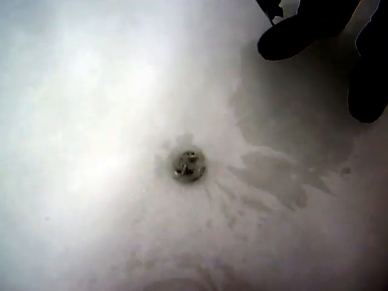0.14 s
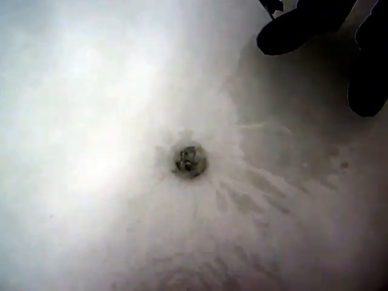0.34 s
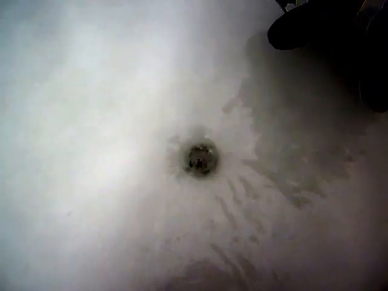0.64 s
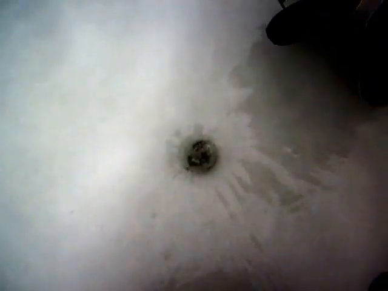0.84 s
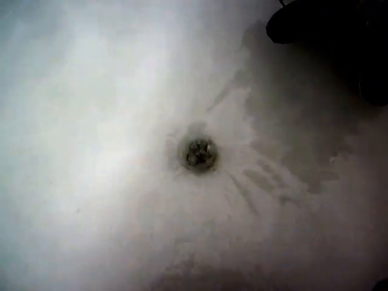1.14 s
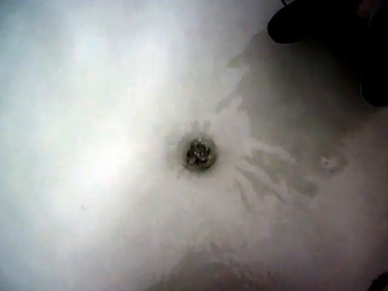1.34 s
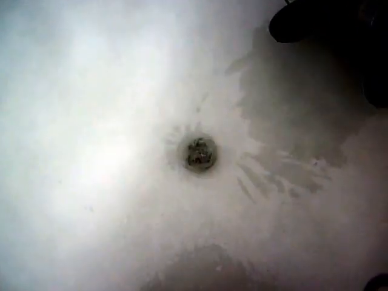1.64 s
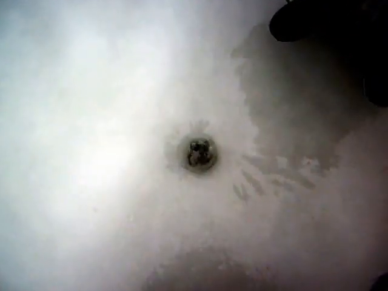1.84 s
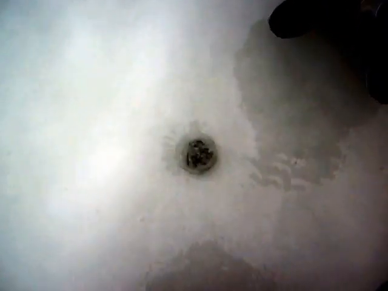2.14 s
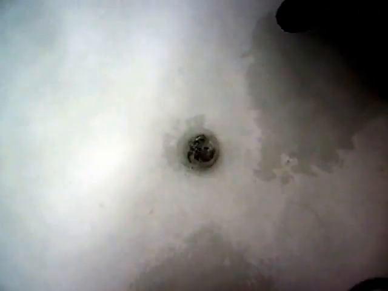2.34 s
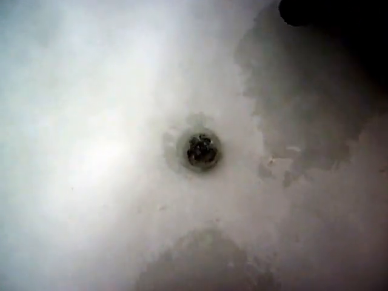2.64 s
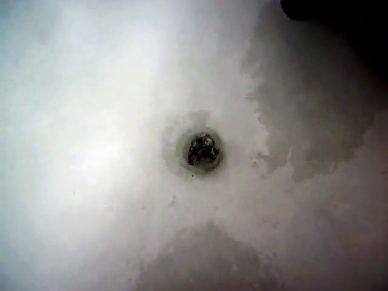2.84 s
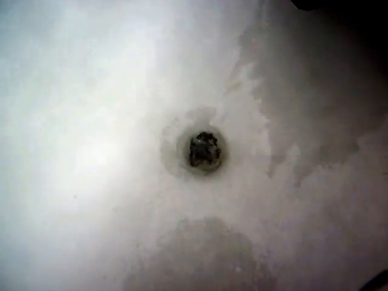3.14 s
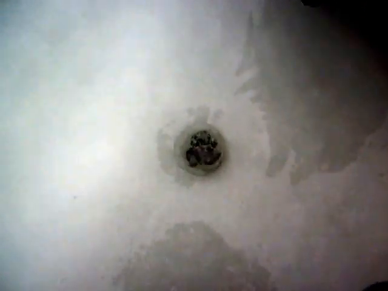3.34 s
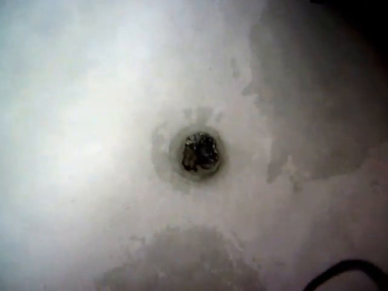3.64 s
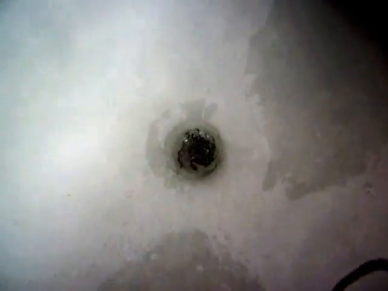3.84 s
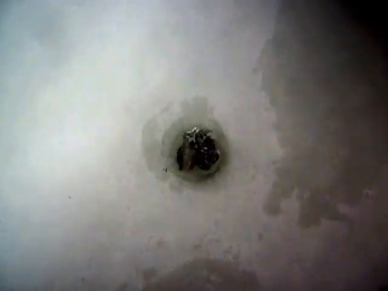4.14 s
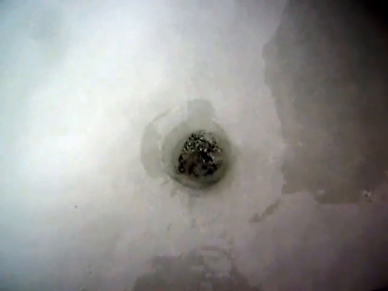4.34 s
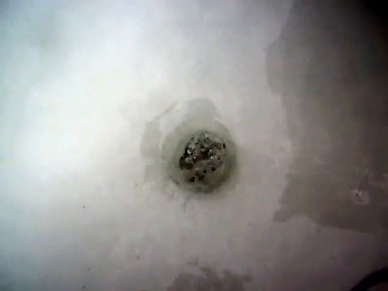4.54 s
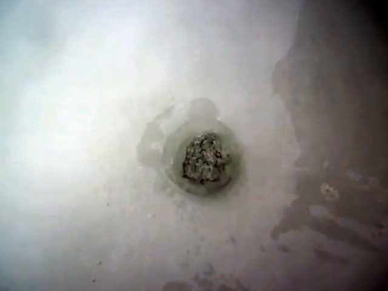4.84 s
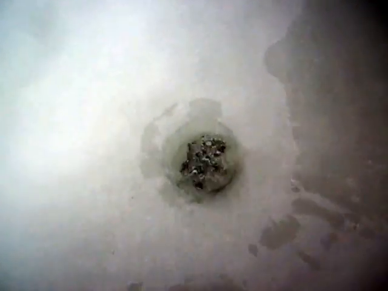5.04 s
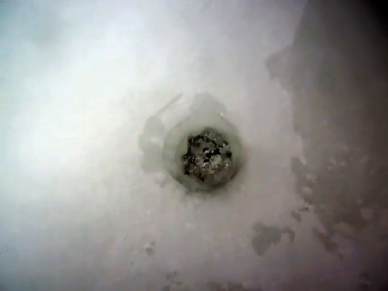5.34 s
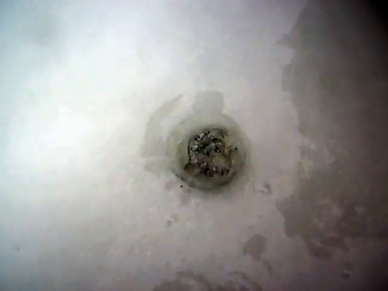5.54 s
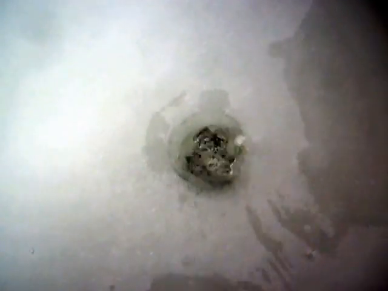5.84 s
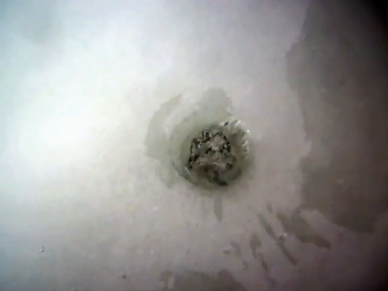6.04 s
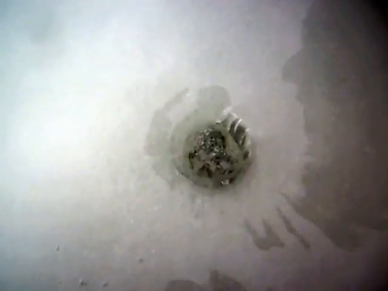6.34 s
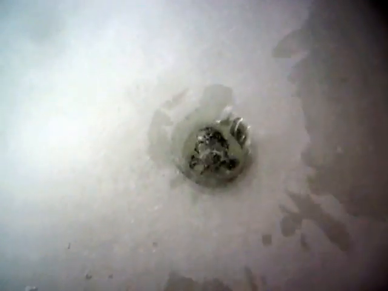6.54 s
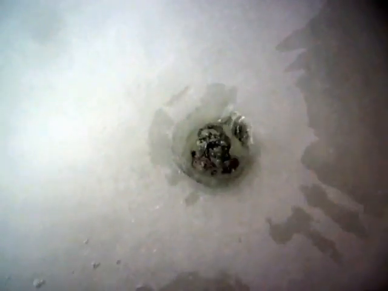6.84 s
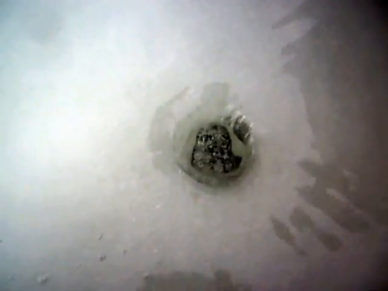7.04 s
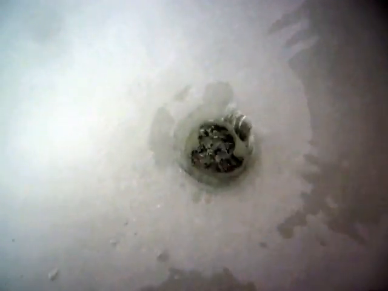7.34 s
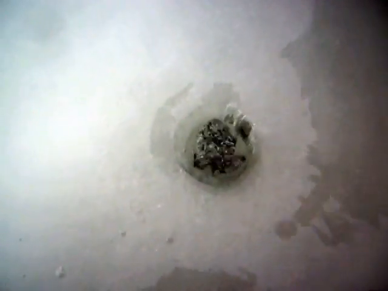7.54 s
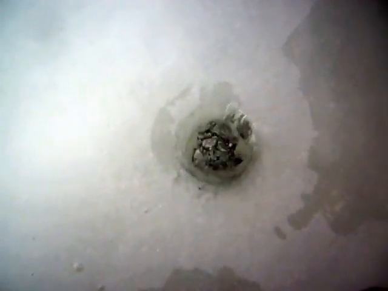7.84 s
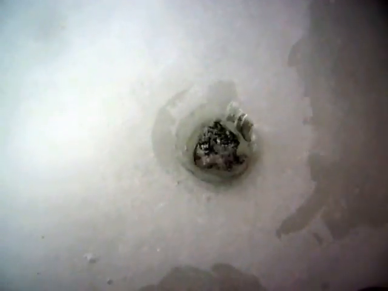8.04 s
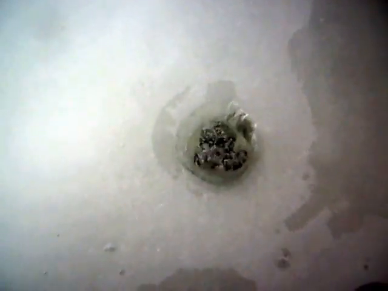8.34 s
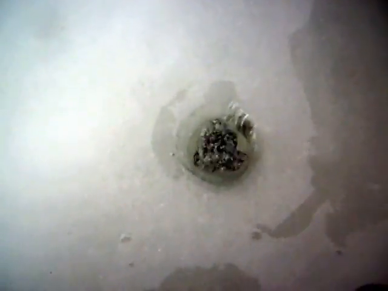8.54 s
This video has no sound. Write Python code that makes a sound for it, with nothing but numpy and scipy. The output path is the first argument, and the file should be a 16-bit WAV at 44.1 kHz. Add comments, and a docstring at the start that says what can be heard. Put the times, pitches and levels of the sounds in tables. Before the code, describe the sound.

Close, dry-sounding water on river ice drains into a small hole. From 0 to 3 s it is a modest, thin trickle: countless tiny bubbles with a high, narrow ring, rising and dipping in little wavelets, with scattered wet plips and fine crackling foam. Around 3.2 s a sharp bright plip stands out, and dull churning grows below. From about 4 s the flow swells quickly into a dense rush, with low gulps of air at 4.3 to 4.4 s and the loudest snapping bubbles around 4.7 to 4.9 s. The tone becomes fuller and more gurgling. Near 5.9 s it gulps softly again and a faint low hollow note appears, like a bottle. The flow eases slightly around 6.5 s, then runs on steadily to the end at about 8.7 s, with uneven surges, bright plips, droplet ticks, fizz and faint microphone hiss.

```python
"""Water standing on river ice drains through a small hole, heard from close by.
First comes a trickle: the inflow folds in air bubbles that each ring for a few milliseconds, coloured by the hole.
The trickle swells to a churn as the hole is washed wide, and pockets of air are gulped down near 4.3 s.
Near 5.9 s it gulps again as a funnel of air opens over the hole and resonates like a bottle.
The water then runs on with this faint hollow note; bubbles, droplets and crackling foam are heard throughout."""
import sys
import numpy as np
from scipy import signal
from scipy.fft import rfft, irfft, next_fast_len
from scipy.io import wavfile
from scipy.ndimage import uniform_filter1d

SR = 44100
rng = np.random.default_rng(int(sys.argv[2]) if len(sys.argv) > 2 else 0)


def file_out(sig):
    """Save sig as 16-bit WAV at sys.argv[1]."""
    # one column per channel
    cols = np.atleast_2d(sig).T
    # limit, then scale
    lim = np.clip(cols, -1, 1)
    pcm = np.round(lim * 32767).astype(np.int16)
    wavfile.write(sys.argv[1], SR, pcm)


N = 383669
TIME = np.arange(N) / SR  # seconds

# the loudest single bubbles: (time [s], level [dB], pitch [Hz], ring time [s])
LOUD_BUBBLES = [(0.232, -30, 2060, .0027), (0.678, -31.5, 1900, 0.0021), (0.73, -33.5, 820, 0.002),
                (1.076, -24.5, 3690, .0006), (1.158, -25, 1960, 0.0033), (1.3, -29.5, 3090, .0033),
                (1.427, -34, 1860, .0045), (1.531, -29.5, 1850, 0.0033), (1.57, -32.5, 880, .008),
                (1.663, -26.5, 3250, 0.0046), (1.945, -35.5, 580, 0.0023), (2.234, -30.5, 3160, 0.0064),
                (2.604, -31.5, 3250, 0.0083), (2.754, -32.5, 3380, 0.0099), (2.793, -29, 2970, .003),
                (3.186, -18, 3570, 0.0017), (3.68, -29.5, 760, 0.0021), (4.028, -22, 3180, .0028),
                (4.097, -19, 3080, 0.0023), (4.145, -27.5, 762, .006), (4.161, -22, 3230, 0.0046),
                (4.289, -21, 3400, .004), (4.4, -19.5, 3330, 0.0013), (4.419, -27.5, 824, 0.0046),
                (4.74, -33, 2100, 0.0062), (4.746, -15, 3230, 0.00065), (4.772, -19, 3360, 0.0024),
                (4.845, -24, 1910, 0.0035), (4.866, -20.5, 3420, 0.003), (4.867, -21.5, 963, .004),
                (4.896, -12.5, 2870, 0.001), (4.898, -14.5, 3390, 0.0031), (4.923, -26, 887, 0.0077),
                (5.137, -23, 3270, 0.00068), (5.363, -18.5, 794, 0.0037), (5.405, -27.5, 3860, 0.0077),
                (5.41, -21.5, 3160, 0.0042), (5.433, -19.5, 3730, 0.0014), (5.57, -30.5, 775, 0.01),
                (5.704, -29.5, 800, 0.0064), (5.865, -19, 3400, 0.0028), (5.9, -30.5, 730, 0.006),
                (5.987, -30.5, 777, 0.02), (5.993, -19, 1850, 0.00082), (6.005, -21, 3360, 0.0025),
                (6.338, -25.5, 2060, .0014), (6.51, -33.5, 780, .005), (6.78, -27, 3400, 0.0021),
                (7.02, -26.5, 860, 0.0064), (7.183, -28, 730, 0.002), (7.458, -31, 1980, 0.0045),
                (7.561, -24.5, 895, 0.0021), (7.566, -25.5, 3360, 0.0025), (7.597, -28, 3210, .0055),
                (7.821, -19, 3360, 0.0023), (7.87, -25.5, 3370, 0.0087), (7.944, -23, 3460, 0.0044),
                (7.974, -28.5, 965, 0.0015), (8.047, -22, 3520, 0.0023), (8.139, -18, 3230, 0.0054),
                (8.368, -29, 2050, 0.014), (8.375, -20, 3300, 0.0022), (8.382, -30.5, 890, .0034),
                (8.525, -20.5, 3260, 0.00065)]
# slow course of the inflow, where 0 dB is a steady run: (time [s], strength [dB])
INFLOW = [(0, -3), (.32, -4.5), (.82, -5), (1.05, -3), (1.58, 0.5), (1.78, -5), (2.55, -3.5), (3.1, -1),
          (3.85, 0.5), (4.1, 3.5), (4.7, 3), (5.05, 2), (5.85, 3), (6.15, 0.5), (6.7, -1), (7.33, -1.54),
          (7.9, 1.04), (8.7, -0.8)]
# wavelets that spill over the rim and briefly swell the inflow; a tilt above 0 is splashy and bright,
# below 0 dull and gurgling: (time of crest [s], length [s], extra inflow [dB], tilt [dB])
WAVELETS = [(.18, 0.24, 2.5, 1.1), (.49, 0.23, 4.3, -0.7), (.72, 0.07, 3.6, 0.34), (.96, 0.25, 3.8, -0.88),
            (1.43, 0.16, 1.8, -1.3), (1.958, 0.28, 4.9, 0.13), (2.392, 0.047, 3.5, 1.9),
            (2.72, 0.21, 1, 0.04), (2.94, .14, 2, -1.7), (3.49, 0.22, 2.3, -2.2),
            (4.02, 0.054, 3.4, -0.039), (4.15, 0.1, 3.8, 0.43), (4.3, .1, 1.4, 3.9),
            (4.42, 0.16, 5.5, -0.75), (4.74, 0.047, 0.83, 2.8), (4.856, 0.14, 1.8, 0.43),
            (5.262, 0.088, 1.8, 1.1), (5.68, 0.069, 0.87, 0.67), (5.92, 0.55, 2.4, -1),
            (6.33, 0.12, 0.97, 0.61), (6.51, 0.15, 1.2, -1.7), (6.8, 0.086, 2.3, -0.57),
            (7.072, 0.47, 4.3, -0.44), (7.456, .12, 3.7, 0.6), (7.77, 0.22, 1.9, -0.17),
            (7.96, 0.091, 3, 0.079), (8.19, .14, 1.7, 3.4), (8.368, 0.11, 3.9, -2.4),
            (8.65, 0.22, 3, -0.52)]
# how far the hole has widened: (time [s], opening [0 narrow to 1 wide])
HOLE_OPENING = [(3.5, 0.028), (5.0, 0.92)]
# large, middle and small bubbles: (lowest pitch [Hz], highest pitch [Hz], rate [bubbles/s],
# typical ring time [s], spread of loudness [dB], level in the steady run [dB],
# rise with the inflow [dB per dB], extra once wide [dB], extra at full suction [dB])
BUBBLE_SIZES = [(587, 1329, 380, 0.0041, 3, -51.5, 1.0, 2, -.5),
                (1370, 2596, 620, 0.0023, 3.5, -46.5, 1.26, 0.06, -3),
                (2634, 5606, 850, 0.0023, 5, -45, 1.29, 0, 1.5)]
# colour that the hole gives to sounds made in it: (pitch [Hz], narrow [dB], washed wide [dB])
HOLE_COLOUR = [(150, -52, -56), (385, -14, -18), (604, -17, -7), (738, -14, 0.5), (855, -5.5, 1.5),
               (1360, -11, -4), (1476, -9.5, -8), (1972, -2, 0), (2276, -9, -4.5), (2925, 1, -9),
               (2950, 1, 4), (3180, 4.5, 8), (3840, -2.5, 2), (4680, -9, -9.5), (5370, -23, -34),
               (9000, -34, -46.5)]
# colour of the fine spray: (pitch [Hz], level [dB])
SPRAY_COLOUR = [(2000, -26), (3300, -9), (4200, -5), (5300, 1), (6500, 1), (8000, -4), (10300, -11),
                (12000, -32.5)]
# droplets and bursting films: (time [s], relative level [dB])
DROPLETS = [(0.951, -43.5), (1.3136, -45.5), (1.8243, -43.5), (1.9974, -44), (2.7453, -46.5), (2.888, -53),
            (4.844, -37.5), (5.053, -40.5), (5.175, -43), (5.3364, -41.5), (5.435, -39), (5.564, -41),
            (5.6967, -36), (5.9269, -35.5), (6.102, -43), (7.1435, -40), (7.7393, -48), (8.4403, -43.5),
            (8.573, -37.5), (8.671, -38.5)]
# low churning under the ice, apart from the wavelets: (time [s], level [dB])
CHURN_LEVEL = [(0, -74), (.65, -87.5), (1.1, -72), (1.8, -76.5), (2.2, -73), (3.35, -68.5), (3.48, -63.5),
               (3.65, -67), (4.35, -57.5), (4.75, -64), (5.08, -66), (5.4, -72), (6.6, -76), (8.7, -70.5)]
# colour of that churning: (pitch [Hz], level [dB])
CHURN_TONE = [(20, -9), (60, -6), (130, -5.5), (300, 2), (480, 1.5), (900, -10.5), (2500, -29)]
# big pockets of air swallowed: (time [s], level [dB], pitch [Hz], ring time [s])
AIR_GULPS = [(4.311, -41, 320, 0.0027), (4.408, -49, 250, 0.0097), (5.852, -42, 293, 0.0053),
             (5.891, -57, 292, .012), (5.925, -38.5, 261, 0.0071)]
# the funnel of air over the hole: (time [s], level [dB], resonance [Hz])
AIR_FUNNEL = [(5.85, -90, 265), (5.98, -67, 264), (6.13, -73, 242), (6.6, -78, 242), (7.2, -70.5, 240),
              (8.0, -71.5, 264), (8.7, -71, 272)]


def trickle(flow, tilt, pull, surge, surge_db=2.0, own_db=0.78, wash_db=-9, rush_db=10, smoothing=0.13):
    """Swarms of large, middle and small bubbles, bunched by the sloshing of the inflow."""
    out = np.zeros(N)
    for k, row in enumerate(BUBBLE_SIZES):
        low, high, per_s, ring, spread_db, db, follow, open_db, suction_db = row
        # countless tiny splashes blur into a wash under the bubbles; suction fuses them into a rush
        band = signal.butter(2, [low, high], "band", fs=SR, output="sos")
        wash = unit(signal.sosfilt(band, rng.standard_normal(N)))
        bubbles = swarm(low, high, per_s, ring, spread_db)
        water = bubbles + amp(wash_db + rush_db * pull) * wash
        # suction also makes the bunching smoother
        bunching = amp((1 - smoothing * pull) * (surge_db * surge + own_db * wander(12)))
        # tilt takes from the large bubbles (k = 0) what it gives to the small ones (k = 2)
        level = db + follow * flow + (k - 1) * tilt
        level = level + open_db * curve(HOLE_OPENING) + suction_db * pull
        out += amp(level) * levelled(through_hole(water * bunching))
    return out


def swarm(low_hz, high_hz, per_s, ring, spread_db, glide=0.035, shortening=0.77, count=240):
    """Bubbles born at random moments; smaller ones tend to die sooner, each pitch with its own ring and glide."""
    pitches = np.geomspace(low_hz, high_hz, count)
    middle_hz = np.sqrt(low_hz * high_hz)
    rings = ring * (middle_hz / pitches) ** shortening * 2 ** rng.uniform(-0.79, 1, count)
    tones = [unit(bubble(hz, ring_s, glide * rng.standard_normal())) for hz, ring_s in zip(pitches, rings)]
    births = clicks(per_s, spread_db)
    kind = rng.integers(0, count, N)
    out = np.zeros(N)
    for i in np.flatnonzero(births):
        add(out, i / SR, births[i] * tones[kind[i]])
    return unit(out)


def bubble(hz, ring, glide, onset_cycles=0.26, neck_s=.0001, size=2400):
    """A bubble pinches off, rings and dies; its pitch slides a little as the current carries it."""
    t = np.arange(size) / SR
    ring = max(ring, 1e-4)
    onset = (1 - np.exp(-t / (onset_cycles / hz + neck_s))) ** 2
    shape = onset * np.exp(-t / ring)
    pitch = hz * (1 + glide * (np.minimum(t / ring, 4) - 1))
    return shape / shape.max() * np.sin(2 * np.pi * np.cumsum(pitch) / SR)


def plips(glide=0.028, snap_db=-2.0, snap_s=0.0026, bright_db=-27, level_db=0.0, low_hz=560):
    """The loud bubbles, each with the wet snap of the neck that closes behind it."""
    tones, snaps = np.zeros(N), np.zeros(N)
    t = np.arange(600) / SR
    for s, db, hz, ring in LOUD_BUBBLES:
        add(tones, s, amp(db) * bubble(hz, ring, glide * rng.standard_normal()))
        add(snaps, s, amp(db) * rng.standard_normal(len(t)) * np.exp(-t / snap_s))
    # bubbles this small radiate almost no bass
    tones = signal.sosfilt(signal.butter(5, low_hz, "high", fs=SR, output="sos"), tones)
    # the snap rings in the hole and throws a little bright spray
    wet_snaps = amp(snap_db) * through_hole(snaps)
    bright_snaps = amp(bright_db) * colour(snaps, SPRAY_COLOUR)
    return amp(level_db) * tones + wet_snaps + bright_snaps


def spray(flow, pull, surge, fizz_db=-67, hiss_db=-77, surge_db=7.0, clump_db=5.0, per_s=800,
          spread_db=4.5, pops_db=-7, open_db=2, follow=1.0, suction_db=8):
    """Fine crackle of foam that follows the inflow in clumps; a wide hole lets more of it out."""
    crackle = swarm(4770, 11020, per_s, 0.00059, spread_db)
    pops = amp(pops_db) * unit(clicks(per_s, spread_db))  # films that burst without ringing
    clumps = amp(surge_db * surge + clump_db * wander(140))
    foam = levelled(colour((crackle + pops) * clumps, SPRAY_COLOUR))
    fizz = amp(fizz_db + open_db * (curve(HOLE_OPENING) - 0.5)) * foam
    hiss = amp(hiss_db + suction_db * pull) * unit(colour(rng.standard_normal(N), SPRAY_COLOUR))
    return amp(follow * flow) * (fizz + hiss)


def ticks(level_db=3, spatter_s=0.0013, specks_share=0.14, size=500):
    """A droplet lands or a film bursts: a tight spatter of tiny clicks."""
    t, out = np.arange(size) / SR, np.zeros(N)
    for s, db in DROPLETS:
        specks = rng.standard_normal(size) * (rng.random(size) < specks_share)
        burst = colour(specks * t * np.exp(-t / spatter_s), SPRAY_COLOUR)
        add(out, s, amp(db + level_db) * burst / (abs(burst).max() + 1e-12))
    return out


def churn(slosh, follow=0.61, lumpy_db=3.0):
    """Dull, lumpy turbulence below the hole that heaves with each wavelet, and the gulps of air."""
    lumps = amp(lumpy_db * wander(25))
    turbulence = unit(colour(rng.standard_normal(N), CHURN_TONE) * lumps)
    out = amp(curve(CHURN_LEVEL) + follow * slosh) * turbulence
    for s, db, hz, ring in AIR_GULPS:
        add(out, s, amp(db) * bubble(hz, ring, glide=-0.028, onset_cycles=0.73))
    return out


def air_core(width_hz=28):
    """The open funnel of air resonates like a bottle, stirred by noise that stands for the splashing."""
    # noise kept in a narrow band around 0 Hz is turned up to the moving resonance
    turn = np.exp(2j * np.pi * np.cumsum(curve(AIR_FUNNEL, axis=2)) / SR)
    r = np.exp(-np.pi * width_hz / SR)
    stir = signal.lfilter([1], np.poly([r, r]), rng.standard_normal(N) / turn)
    return amp(curve(AIR_FUNNEL)) * levelled((stir * turn).real)


def through_hole(x, ring_hz=3260, ring_width_hz=130, ring_db=-1):
    """The narrow hole adds its colour and a thin high ring; both fade to a wider colour as it is washed out."""
    hole = np.array(HOLE_COLOUR)
    wide = np.clip(curve(HOLE_OPENING), 0, 1)
    ring = signal.lfilter(*signal.iirpeak(ring_hz, ring_hz / ring_width_hz, fs=SR), x)
    narrow_sound = colour(x + amp(ring_db) * ring, hole[:, [0, 1]])
    wide_sound = colour(x, hole[:, [0, 2]])
    return (1 - wide) * narrow_sound + wide * wide_sound


def echoes(x, wet_db=-14, t60=0.053, size=4000):
    """Quick scattered reflections from the wall of the hole and the sheet of water."""
    t = np.arange(size) / SR
    # random reflections start after 2 ms and fall by 60 dB in t60 seconds
    taps = rng.standard_normal(size) * amp(-60 * t / t60) * (t > .002)
    return x + amp(wet_db) * signal.oaconvolve(x, taps / np.linalg.norm(taps))[:N]


def sloshing():
    """A smooth hump for each wavelet: the extra inflow and the tilt towards small bubbles, both in dB."""
    s, length, db, tilt_db = np.transpose(WAVELETS)
    coarse = TIME[::64]  # the humps are slow, so every 64th sample is enough
    humps = np.cos(np.pi * np.clip((coarse[:, None] - s) / length, -.5, .5)) ** 2
    return [np.interp(TIME, coarse, humps @ height) for height in (db, tilt_db)]


def suction(strongest_s=4.36, rise_s=0.84, fall_s=0.26):
    """Pull of the hole, 0 to 1: it builds up as the hole is torn wide, then lets go faster."""
    span = np.where(TIME < strongest_s, rise_s, fall_s)
    return np.exp(-((TIME - strongest_s) / span) ** 2)


def amp(db):
    """Turns decibels into a gain."""
    return 10 ** (np.asarray(db) / 20)


def unit(x):
    """Scales a sound to an average strength (rms) of 1."""
    return x / np.sqrt(np.mean(x ** 2) + 1e-20)


def curve(rows, axis=1):
    """One column of a table, joined by straight lines in time."""
    rows = np.asarray(rows)
    return np.interp(TIME, rows[:, 0], rows[:, axis])


def add(mix, s, sound):
    """Mixes a sound in at a time in seconds."""
    part = mix[max(round(s * SR), 0):][:len(sound)]
    part += sound[:len(part)]


def colour(x, points, size=4096):
    """Filter with the given spectrum: it rings after a click, never before (minimum phase)."""
    hz, db = np.transpose(points)
    grid = abs(np.fft.fftfreq(size, 1 / SR))
    log_gain = np.log(amp(np.interp(np.log(grid + 1), np.log(hz), db)))
    taps = np.fft.ifft(np.exp(signal.hilbert(log_gain).conj())).real
    return signal.oaconvolve(x, taps[:size // 2])[:len(x)]


def wander(hz):
    """Random drift of rms 1, mostly slower than hz."""
    size = next_fast_len(N, real=True)
    grid = np.fft.rfftfreq(size, 1 / SR)
    spectrum = rfft(rng.standard_normal(size)) / (1 + (grid / hz) ** 4)
    return unit(irfft(spectrum, size)[:N])


def levelled(x, size=6000):
    """Holds the power steady over about a seventh of a second, leaving the quick bursts."""
    power = uniform_filter1d(uniform_filter1d(x ** 2, size), size // 2)
    return x / np.sqrt(abs(power) + 1e-12)


def clicks(per_s, spread_db, cap=4.99):
    """Random impulses of either sign, many small and a few large."""
    sizes = amp(spread_db * np.minimum(rng.exponential(1, N), cap))
    return sizes * rng.choice([-1, 1], N) * (rng.random(N) < per_s / SR)


def scene():
    """The water sounds share one sloshing inflow; churn and air funnel are mixed in without echoes."""
    slosh, tilt = sloshing()
    pull = suction()
    surge = wander(32.6)
    flow = curve(INFLOW) + slosh
    bubbles = trickle(flow, tilt, pull, surge) + plips()
    water = echoes(bubbles + spray(flow + tilt, pull, surge) + ticks())
    return (water + churn(slosh) + air_core())[None]


def record(dry, hiss_db=-77, edge_hz=11250):
    """A small microphone with its own faint hiss and a steep upper limit."""
    noisy = dry + amp(hiss_db) * rng.standard_normal(N)
    lowpass = signal.firwin(161, edge_hz, window=("kaiser", 7), fs=SR)
    return signal.oaconvolve(noisy, lowpass[None], "same")


dry = scene()
out = record(dry)
file_out(out)
```